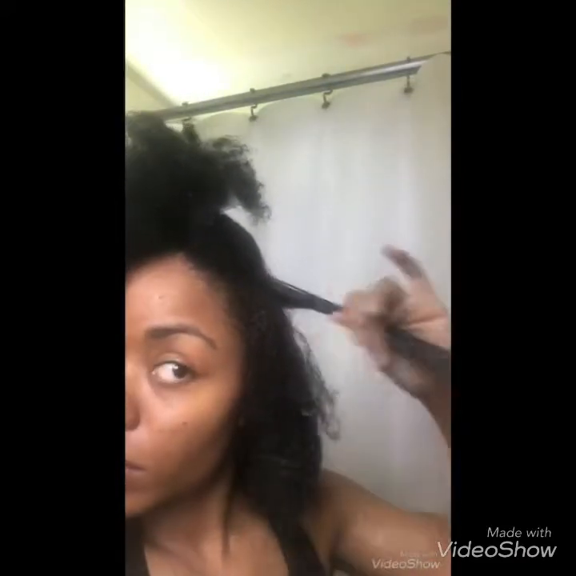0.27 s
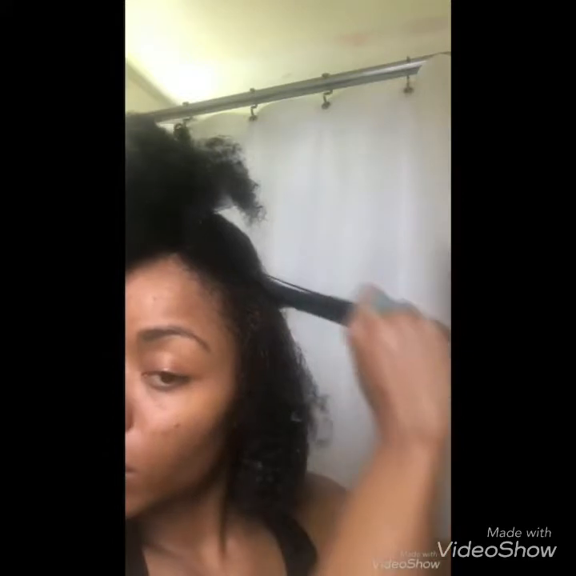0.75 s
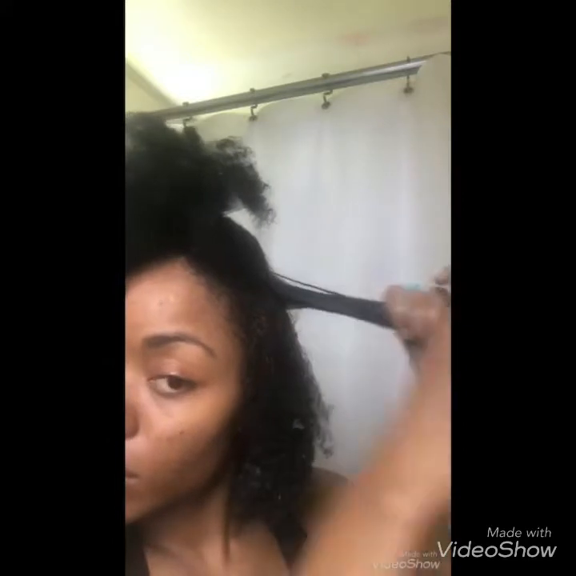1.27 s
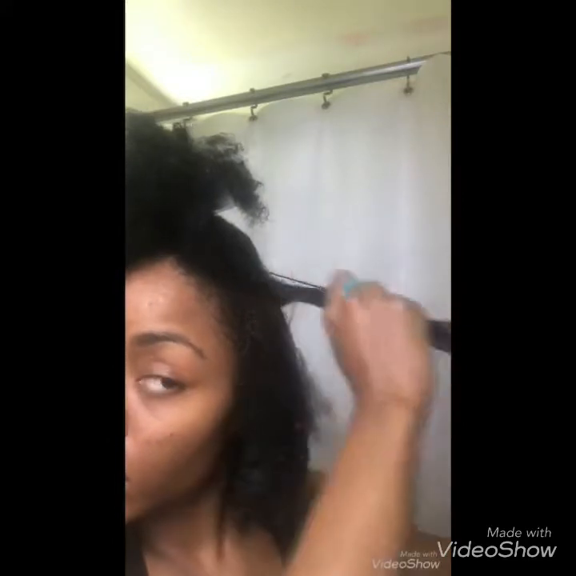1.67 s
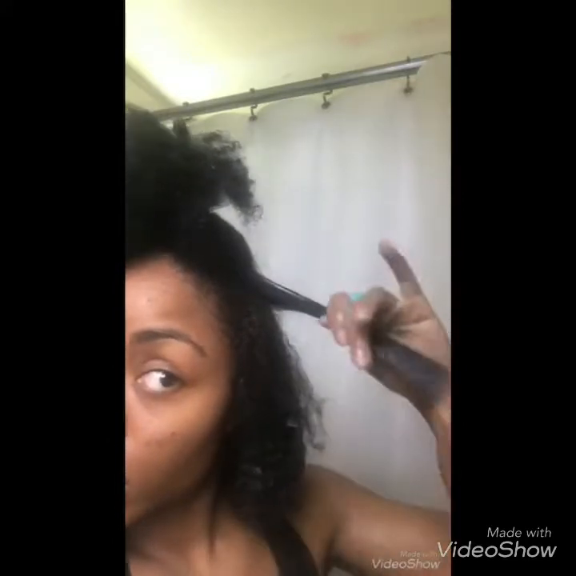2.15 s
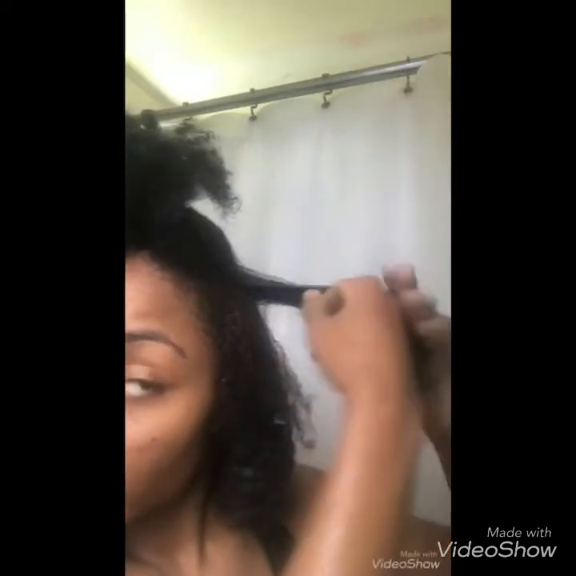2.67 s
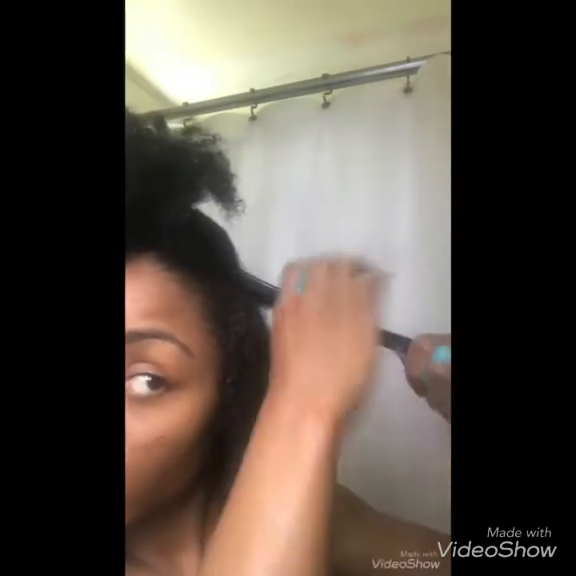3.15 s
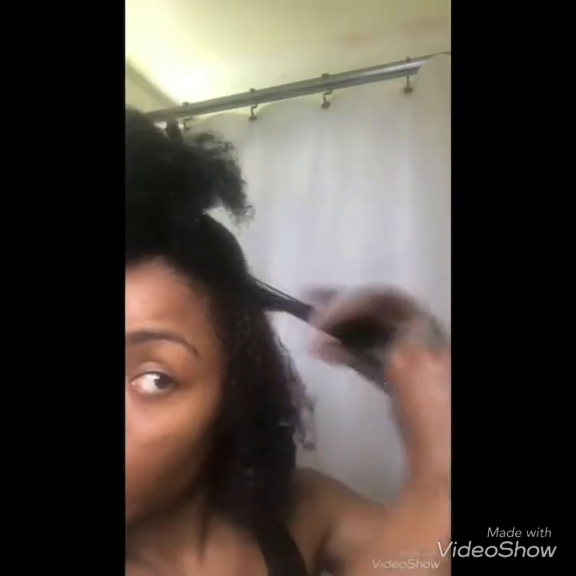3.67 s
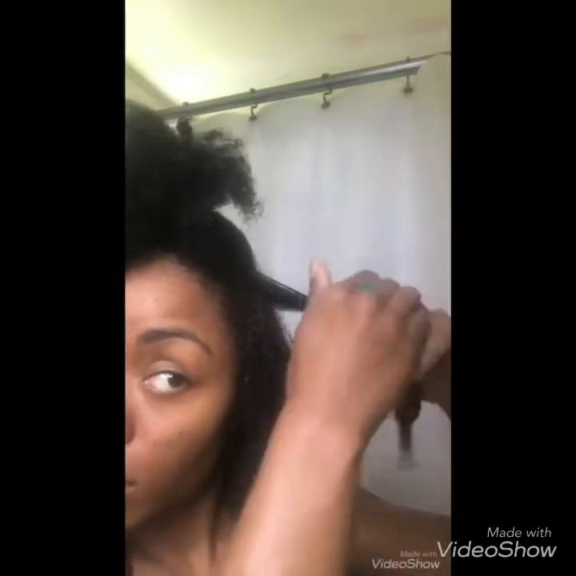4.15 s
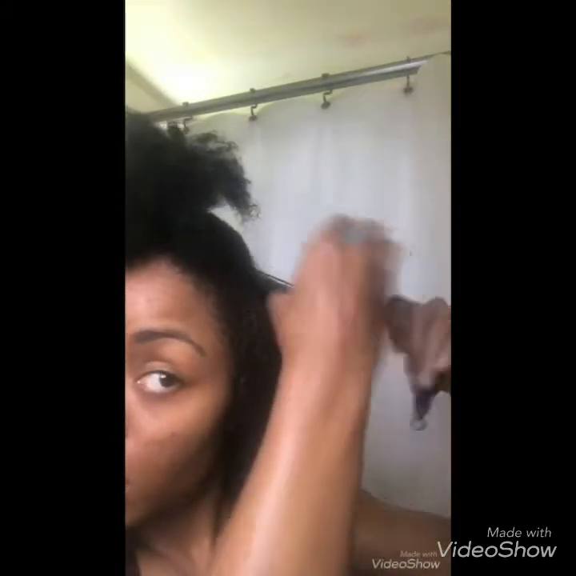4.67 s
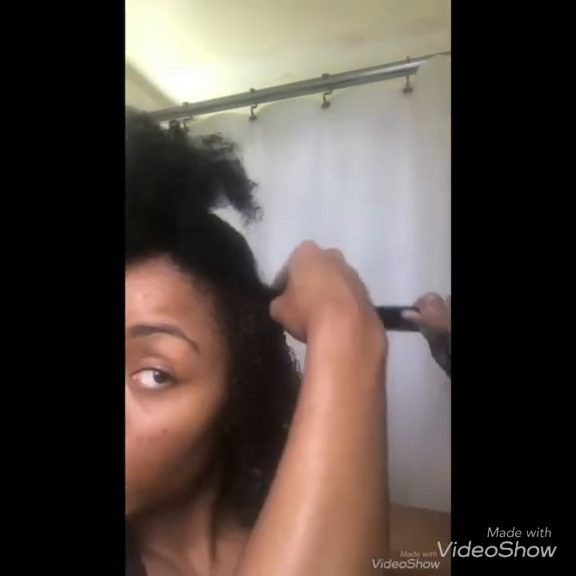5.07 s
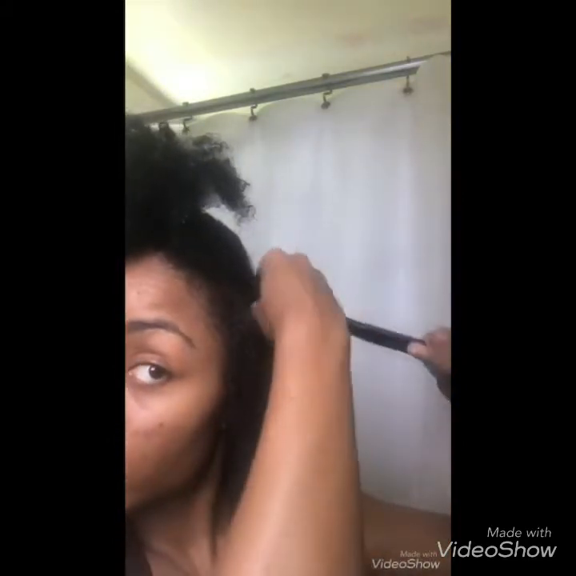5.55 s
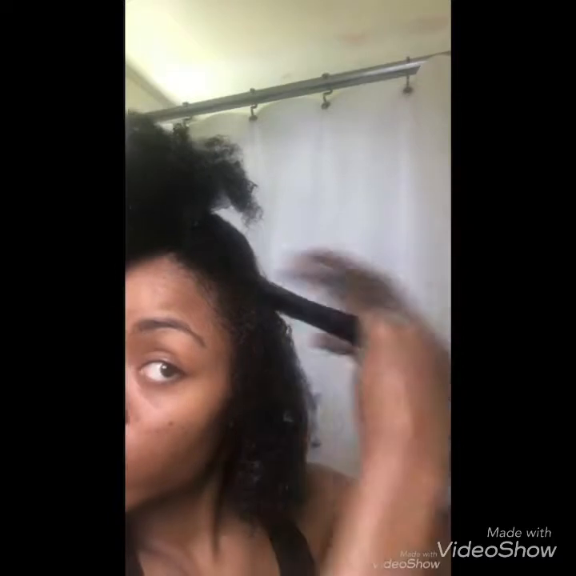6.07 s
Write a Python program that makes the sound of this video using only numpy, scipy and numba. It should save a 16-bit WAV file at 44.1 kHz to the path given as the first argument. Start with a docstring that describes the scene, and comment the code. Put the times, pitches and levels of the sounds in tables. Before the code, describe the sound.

Steady shower spray hisses and patters into a tub, with scattered splashes, small plops and a faint low drumming.

```python
"""Shower in a small tiled bathroom

Fine spray hisses and surges an arm's length away, and gushes slap skin and tub.
Drops patter on the pool and drum the low modes of tub and room; trapped air bubbles plop.
The tiles give splashes and plops a short bright tail. A mono phone hears it all."""
import sys
import numpy as np
from scipy import signal
from scipy.fft import rfft, irfft, next_fast_len
from scipy.io import wavfile
from scipy.ndimage import uniform_filter1d
from numba import njit

SR = 44100
rng = np.random.default_rng(int(sys.argv[2]) if len(sys.argv) > 2 else 0)


def wav_record(signal):
    """Record a signal, one row per channel, as 16-bit PCM in the file named by sys.argv[1]."""
    frames = np.transpose(np.atleast_2d(signal))
    bounded = np.clip(frames, -1, 1)
    # unit amplitude maps onto the largest positive 16-bit level
    quanta = np.round(bounded * 32767).astype(np.int16)
    wavfile.write(sys.argv[1], SR, quanta)


N = 278712


def undb(db):
    """Decibels to gain."""
    return 10 ** (np.asarray(db) / 20)


def unit(x):
    """Scale to rms 1."""
    return x / np.sqrt(np.mean(x ** 2))


@njit
def bandpass(x, hz, width_hz):
    """State-variable band-pass, gain 1 at the centre."""
    out, band, low = np.empty(len(x)), 0., 0.
    g, damping = np.tan(np.pi * hz / SR), width_hz / hz
    for i in range(len(x)):
        v = (band + g * (x[i] - low)) / (1 + g * (g + damping))
        band, low = 2 * v - band, low + 2 * g * v
        out[i] = damping * v
    return out


def steep_band(x, hz, width_hz):
    """Two band-passes in series for steeper sides."""
    return bandpass(bandpass(x, hz, width_hz), hz, width_hz)


def colour(x, curve):
    """Equalise x along a curve of (Hz, dB) points."""
    hz, db = np.transpose(curve)
    size = next_fast_len(len(x))
    bin_hz = np.maximum(np.arange(size // 2 + 1) * SR / size, 1)
    gain = undb(np.interp(np.log(bin_hz), np.log(hz), db))
    return irfft(rfft(x, size) * gain, size)[:len(x)]


def wander(rate_hz):
    """Smooth random modulation with a spread near 1."""
    hold = int(SR / rate_hz)
    steps = np.repeat(rng.standard_normal(N // hold + 1), hold)
    return 1.3 * uniform_filter1d(uniform_filter1d(steps, hold), hold)[:N]


def drops(scatter_db):
    """A drop impact at every instant; some are larger than the rest, none huge."""
    return rng.standard_normal(N) * undb(scatter_db * np.minimum(rng.exponential(size=N), 4))


def flicker(x, low_hz, bands, shared_db, own_db, rate_hz):
    """As the jets wander, overlapping third-octave bands swell together and flutter alone."""
    swell_db = shared_db * wander(rate_hz)
    bin_hz = np.maximum(np.arange(N // 2 + 1) * SR / N, 1)
    position = np.clip(3 * np.log2(bin_hz / low_hz), 0, bands - 1)
    spectrum, out = rfft(x), np.zeros(N)
    for k in range(bands):
        band = irfft(spectrum * np.maximum(1 - abs(position - k), 0), N)
        out += undb(swell_db + own_db * wander(rate_hz)) * band
    return out


def bubbles(rows, glide):
    """Each bubble is a dying sine; glide lifts its pitch as it nears the surface."""
    out = np.zeros(N + SR)
    for start, db, hz, cycles in rows:
        turns = np.arange(int(3 * cycles / hz * SR)) * hz / SR
        envelope = (1 - np.exp(-turns / 3.2)) * np.exp(-2 * turns / cycles)
        phase = 2 * np.pi * turns * (1 - glide / 2 + glide * turns / (2 * cycles))
        i = int(start * SR)
        out[i:i + len(turns)] += undb(db) * envelope * np.sin(phase)
    return out[:N]


def bursts(rows, rise_s):
    """Clouds of droplets: bands of noise with a fast attack and a slower fade."""
    out = np.zeros(N + SR)
    for start, db, hz, decay_s, relative_width in rows:
        t = np.arange(min(int(6 * decay_s * SR), SR // 8)) / SR
        noise = rng.standard_normal(SR // 8)[:len(t)]
        cloud = unit(steep_band(noise, hz, relative_width * hz)) / 3  # peaks near 1
        envelope = (1 - np.exp(-t / rise_s)) * np.exp(-t / decay_s)
        i = int(start * SR)
        out[i:i + len(t)] += undb(db) * envelope * cloud
    return out[:N]


def spray(level_db):
    """Fine droplets burst in a bright, dense crackle."""
    # Tone of the spray. Each row: frequency in Hz, gain in dB.
    spray_curve = [(1650, -7), (2800, -30), (4530, -4.5), (4980, -4.5), (6170, 0), (9430, 0.5), (10300, 1),
                   (12700, 3.5), (14400, 3.5), (15700, -1)]
    hiss = flicker(drops(scatter_db=2.0), low_hz=2820, bands=9, shared_db=0.28, own_db=1.0, rate_hz=22)
    return undb(level_db) * unit(colour(hiss, spray_curve))


def pool(level_db):
    """Drops patter on the shallow water."""
    # Tone of the patter. Each row: frequency in Hz, gain in dB.
    patter_curve = [(210, -27), (360, -1), (440, -4), (598, 4), (795, -11.5), (1090, -3.5), (1850, -2.5),
                    (2830, -3), (4500, -7.5), (5850, -21), (9900, -120)]
    patter = flicker(drops(scatter_db=0.5), low_hz=350, bands=12, shared_db=1.64, own_db=1.2, rate_hz=11)
    return undb(level_db) * unit(colour(patter, patter_curve))


def drumming(level_db):
    """The jets beat on the tub; each low mode is driven by its own patch of drops."""
    # Low modes of tub and room. Each row: centre in Hz, width in Hz, gain in dB.
    tub_modes = [(53.5, 15.3, 0.5), (65.8, 14.3, 1), (75.7, 13, -1), (101.7, 21.4, -2), (119.6, 10, -16.5),
                 (137, 33, -7), (158.6, 12.4, 1.5), (201, 15.7, -1), (222.7, 15.8, -5), (236.3, 15.5, 0),
                 (277.1, 40.5, -5), (297.7, 16.3, -5), (343.7, 32, -9.5), (590, 41, -16)]
    # Brief low hums in the drumming. Each row: start in seconds, level in dB,
    # pitch in Hz, length in cycles.
    hums = [(1.14, -39, 560, 13), (4.05, -45, 580, 62), (4.19, -47.5, 585, 95), (5.86, -33.5, 295, 10),
            (5.87, -39, 159, 42)]
    rumble = sum(undb(db) * steep_band(drops(scatter_db=1.5), hz, width) for hz, width, db in tub_modes)
    return undb(level_db) * unit(rumble) + bubbles(hums, glide=0)


def splashes():
    """Gushes slap skin and tub, with many small splatters scattered between them."""
    # The gushes. Each row: start in seconds, level in dB, centre in Hz.
    slaps = [(0.047, -28, 11600), (0.096, -30, 12800), (0.252, -33, 11800), (0.285, -35, 5230),
             (0.508, -36, 6300), (0.512, -33, 11500), (0.793, -32, 6400), (1.155, -29, 13900),
             (1.618, -27, 11500), (1.674, -35, 6600), (1.83, -28, 13700), (2.104, -35.5, 3080),
             (2.417, -28, 13000), (2.553, -34, 3600), (2.647, -32, 6290), (2.761, -29, 14100),
             (2.844, -26.5, 10700), (2.916, -29, 14200), (3.004, -35.5, 3730), (3.144, -39, 6500),
             (3.247, -32, 6340), (3.251, -37, 3300), (3.528, -28.5, 12700), (3.566, -33.5, 5200),
             (3.958, -36, 13100), (4.007, -31, 9920), (4.242, -34, 6500), (4.298, -29, 13000),
             (4.313, -24, 12600), (4.331, -28, 11500), (4.357, -34, 5810), (4.458, -30, 12100),
             (4.514, -31, 6600), (4.661, -26, 11200), (4.731, -30, 13600), (4.908, -33, 12400),
             (4.97, -37, 9000), (5.138, -26, 12800), (5.215, -28, 13100), (5.309, -31, 12700),
             (5.456, -28, 7440), (5.666, -29, 13300), (5.716, -25.5, 11000), (6.027, -24, 12000),
             (6.14, -26, 14000)]
    decay_s = 0.017
    gushes = [(start, db, hz, decay_s, (hz / 7800) ** 0.7) for start, db, hz in slaps]  # brighter: wider
    splatters = [(when * N / SR, -52 + 8.4 * bright + 9.7 * force, 3200 * 3.7 ** bright,
                  0.0077 + 0.02 * length, 0.25) for when, force, bright, length in rng.random((280, 4))]
    return bursts(gushes, rise_s=0.0016) + bursts(splatters, rise_s=0.0006)


def plops(fizz_db):
    """Fat drops splat and trap a bubble; a swarm of small bubbles fizzes around them."""
    # Drops into the pool. Each row: start in seconds, bubble level in dB, pitch in Hz,
    # splat level against the bubble in dB.
    fat_drops = [(0.119, -37, 1767, -5), (0.289, -40, 1760, -6), (0.395, -36, 1574, -1),
                 (0.425, -38, 1710, 0), (0.455, -33.5, 1863, 2), (0.511, -39, 2290, 4),
                 (0.59, -37.5, 2200, -5), (1.0, -41, 2170, 1), (1.137, -42, 1110, 2),
                 (1.244, -42, 1750, -3), (1.49, -37.5, 2250, 0), (1.913, -34.5, 1850, -5),
                 (2.043, -40.5, 2500, -3), (2.296, -38, 1890, 4.5), (2.77, -41, 1166, -7),
                 (2.85, -34, 2150, -2), (3.019, -36, 1590, -1), (3.065, -39, 2520, -8),
                 (3.2, -34.5, 1860, -2), (3.25, -42, 1610, 3), (3.509, -39, 1880, 2),
                 (3.607, -35.5, 2074, 0.5), (3.782, -41, 2160, -4), (3.843, -42, 1880, 0),
                 (3.9, -36, 2020, 2.5), (4.237, -41, 2370, 5), (4.551, -41, 1550, -3),
                 (4.66, -34.5, 1420, 4), (4.765, -41.5, 1120, -1), (4.834, -37, 2430, -4),
                 (5.119, -39, 2534, -3), (5.345, -35, 2070, 2), (5.384, -41, 2385, 5),
                 (5.489, -38, 2150, -2), (5.78, -40, 2000, 1), (5.81, -37.5, 857, -6),
                 (5.815, -32, 1608, -0.5), (5.82, -39, 1190, 0), (5.824, -40, 2510, 2),
                 (5.849, -34, 2510, -3), (5.885, -42, 2040, 4), (5.935, -39, 2410, 0),
                 (6.074, -38.5, 1460, -4), (6.287, -40, 2000, 7)]
    ring_cycles, splat_decay_s, splat_width = 24.5, 0.025, 0.9
    swarm = [(when * N / SR, 4.7 * force ** 2, 1400 * 5.0 ** pitch, 8 + 22 * length)
             for when, force, pitch, length in rng.random((800, 4))]
    weak_drops = [(when * N / SR, -39.5 - 12 * softness, 1490 * (2485 / 1490) ** pitch, -6)
                  for when, softness, pitch in rng.random((24, 3))]
    hits = np.vstack([fat_drops, weak_drops])
    trapped_air = bubbles([(start, db, hz, ring_cycles) for start, db, hz, _ in hits], glide=0.018)
    splats = bursts([(start, db + splat_db, hz, splat_decay_s, splat_width)
                     for start, db, hz, splat_db in hits], rise_s=0.0034)
    fizz = undb(fizz_db) * unit(bubbles(swarm, glide=0.095))
    return fizz + trapped_air + splats


def tiles(x, t60_s=0.13, wet_db=-7.5):
    """The tiled walls add a short, dense tail."""
    t = np.arange(int(t60_s * SR)) / SR
    decay = np.exp(-np.log(1000) * t / t60_s) * (t > 0.003)  # 3 ms pre-delay
    tail = rng.standard_normal(SR)[:len(t)] * decay
    tail /= np.sqrt(np.sum(tail ** 2))
    return x + undb(wet_db) * signal.fftconvolve(x, tail)[:N]


def stall(water, direct_db=-3, ring_db=-8.5):
    """The pool's patter and plops are heard directly, with the stall's air modes ringing along."""
    # Air modes of the stall. Each row: centre in Hz, width in Hz, relative gain in dB.
    air_modes = [(927, 11, 6), (1103, 69, 4.5), (1540, 54, -34), (1596, 19, 6.5), (1785, 24, 4),
                 (1923, 19, 10), (2038, 50, 2), (2196, 42, 5.5), (2389, 93, 4), (2533, 43, 2)]
    ringing = sum(undb(db) * bandpass(water, hz, width) for hz, width, db in air_modes)
    return undb(direct_db) * water + undb(ring_db) * ringing


def scene():
    """Spray, splashes and pool sound in the stall, over the drumming tub."""
    # Slow drift of the shower. Each row: time in seconds, then faders in dB for spray, pool, drumming.
    flow = [(0.0, -42, -50, -50), (0.6, -41.5, -50, -50), (1.4, -42.5, -50, -49.5),
            (2.1, -42.5, -51, -50.5), (2.9, -42, -49.5, -50), (3.7, -42, -50.5, -48),
            (4.4, -41.5, -50, -51), (4.999, -41.5, -49, -48.5), (5.6, -41, -50, -48), (6.32, -42, -51, -50)]
    times, *faders = np.transpose(flow)
    spray_db, pool_db, drum_db = (np.interp(np.arange(N) / SR, times, fader) for fader in faders)
    water = pool(pool_db) + tiles(plops(fizz_db=pool_db - 7))
    mono = spray(spray_db) + tiles(splashes()) + stall(water) + drumming(drum_db)
    return np.array([mono, mono])


def record(dry):
    """The microphone port notches the treble; the phone cuts the deep bass and the top."""
    # Notches of the port. Each row: centre in Hz, width in Hz, depth from 0 to 1.
    port_dips = [(4990, 170, 0.6), (8320, 350, 0.26), (10400, 560, 0.59)]
    low_cut_hz, high_cut_hz = 42, 15765
    mono = signal.sosfilt(signal.butter(4, low_cut_hz, "high", fs=SR, output="sos"), dry[0])
    for hz, width, depth in port_dips:
        mono = mono - depth * bandpass(mono, hz, width)
    mono = signal.sosfilt(signal.ellip(18, 0.1, 80, high_cut_hz, fs=SR, output="sos"), mono)
    return np.array([mono, mono])


dry = scene()
out = record(dry)
wav_record(out)
```